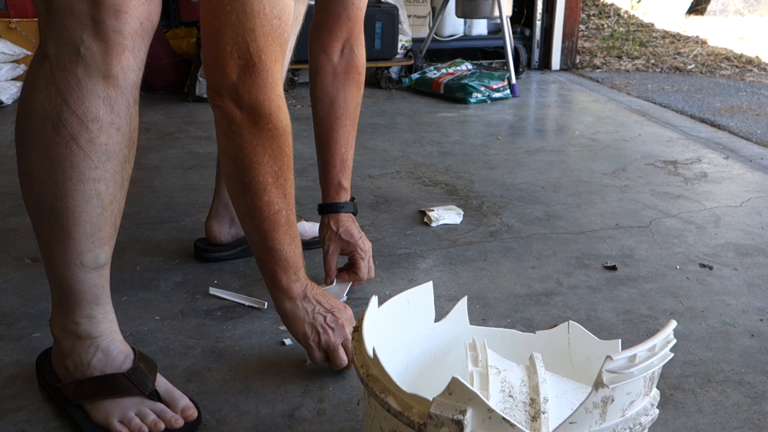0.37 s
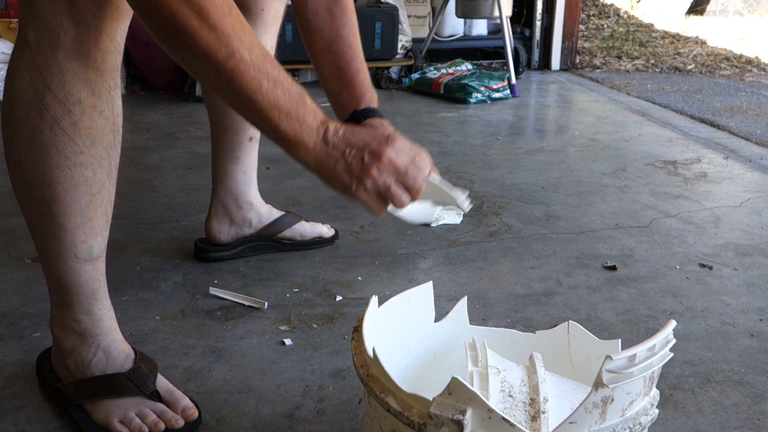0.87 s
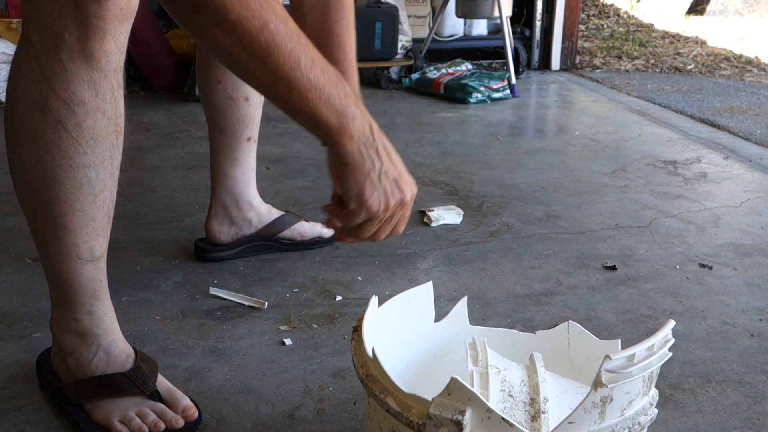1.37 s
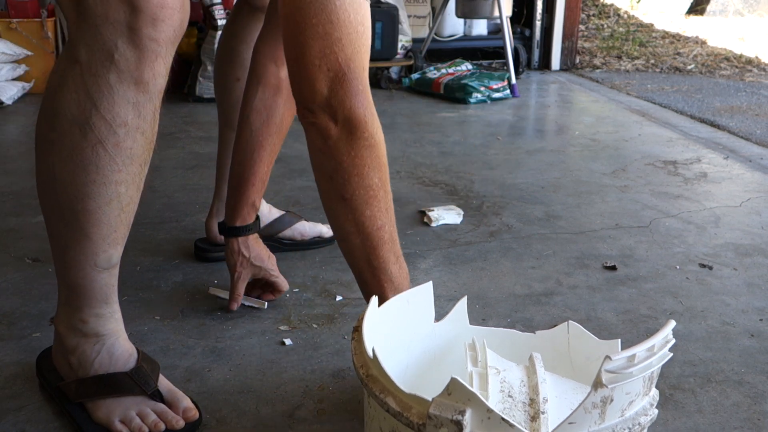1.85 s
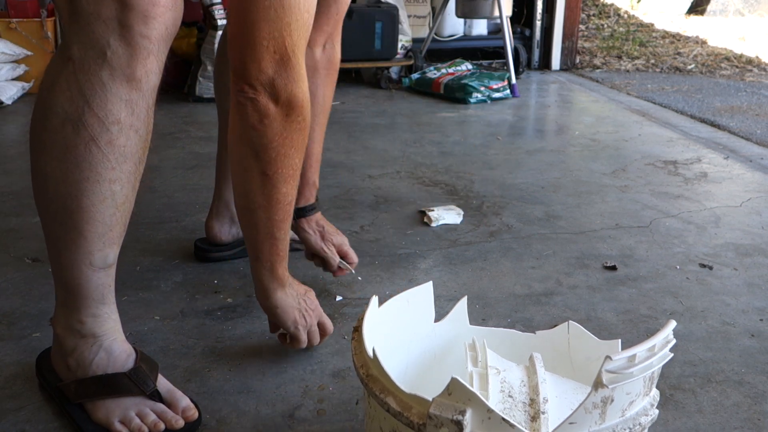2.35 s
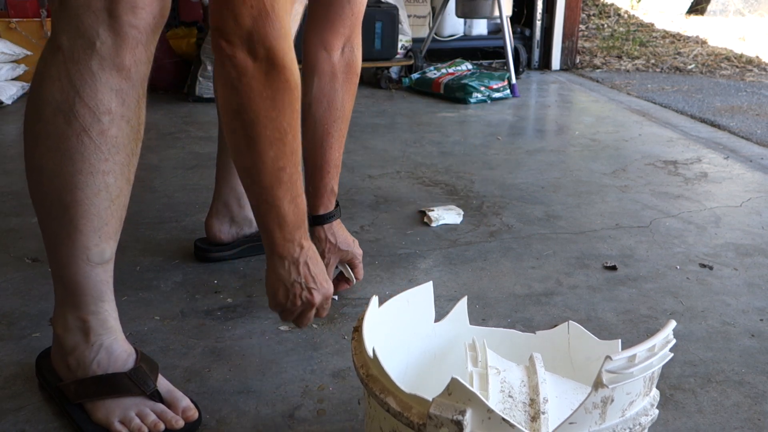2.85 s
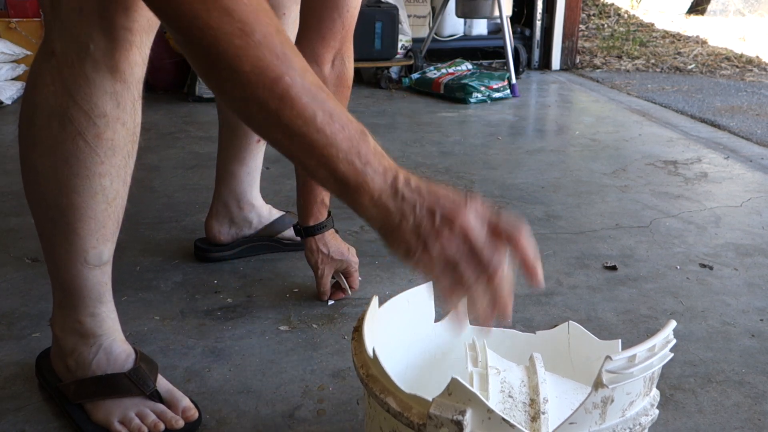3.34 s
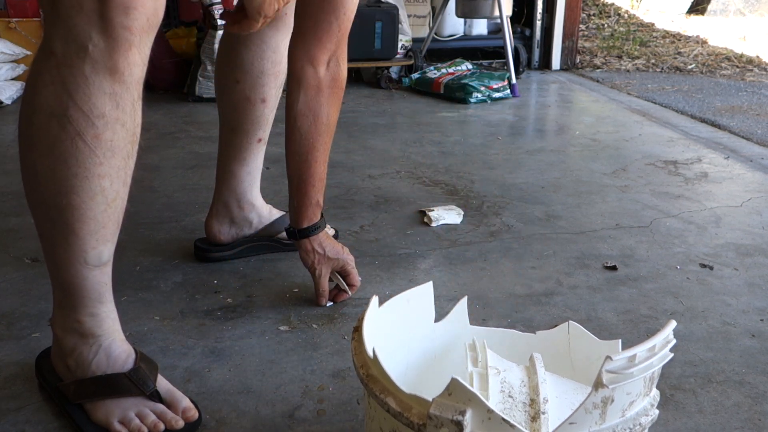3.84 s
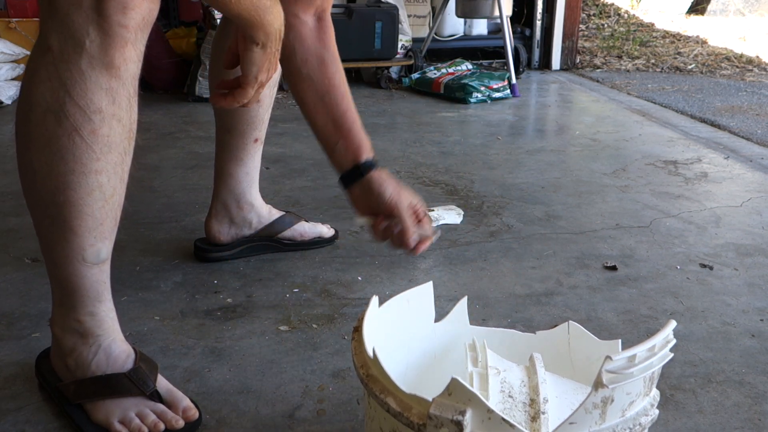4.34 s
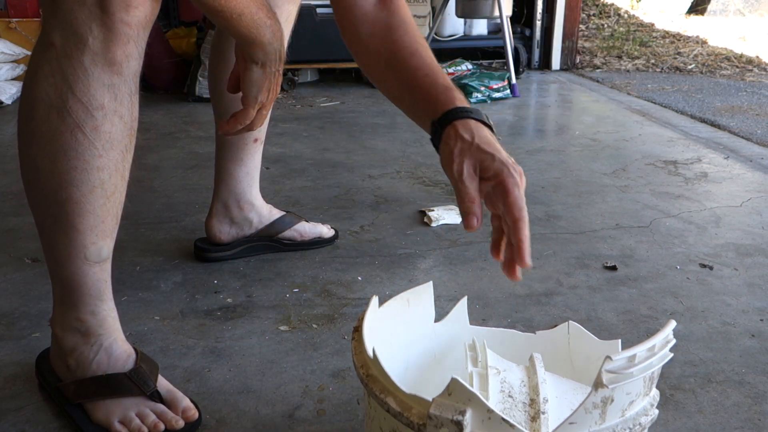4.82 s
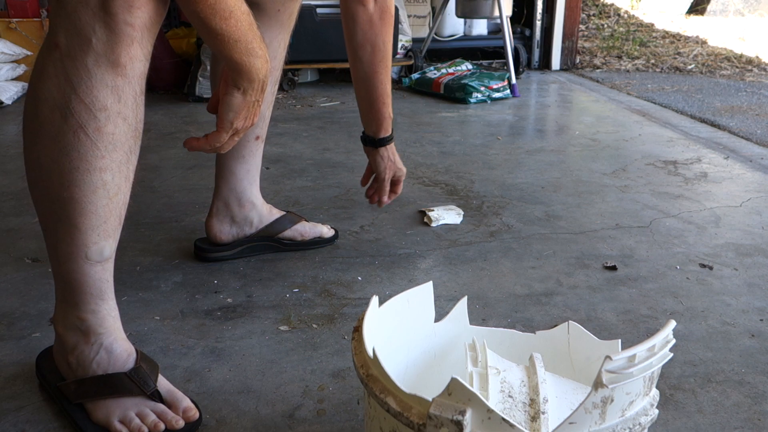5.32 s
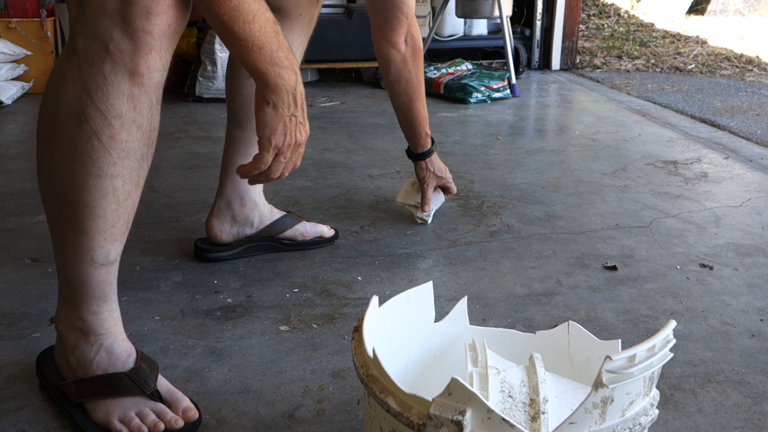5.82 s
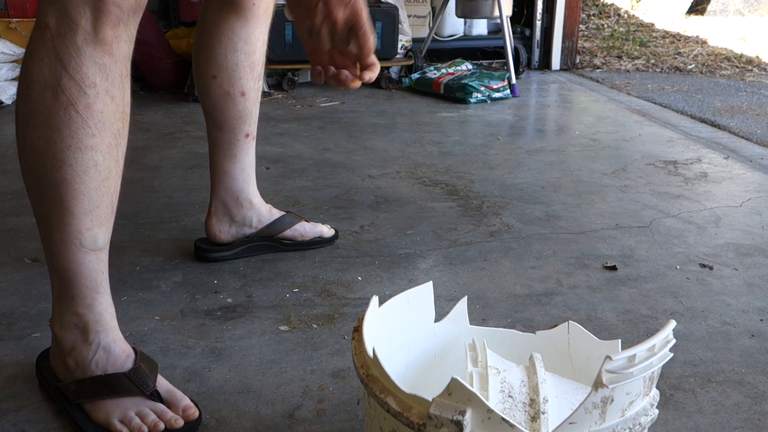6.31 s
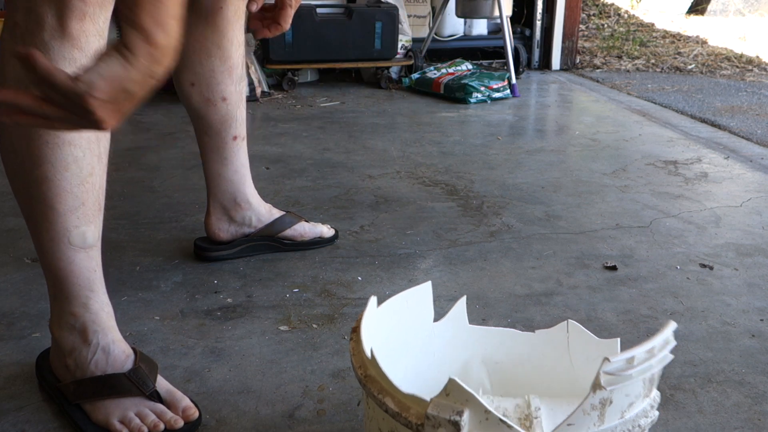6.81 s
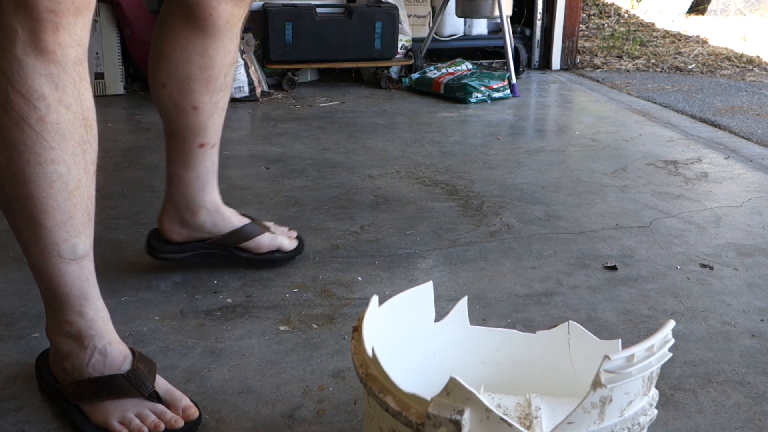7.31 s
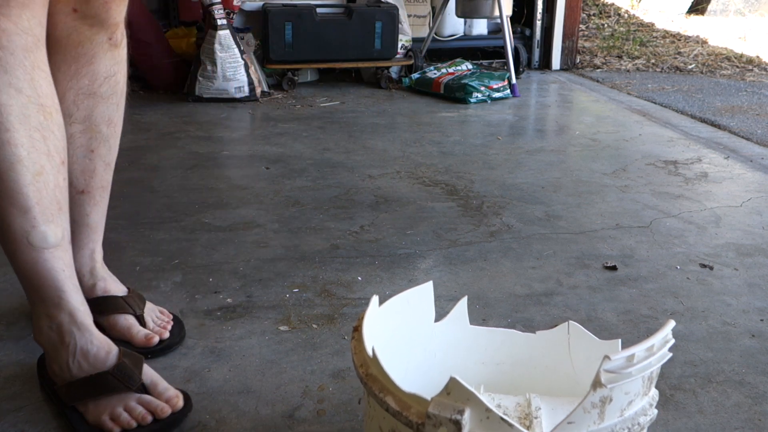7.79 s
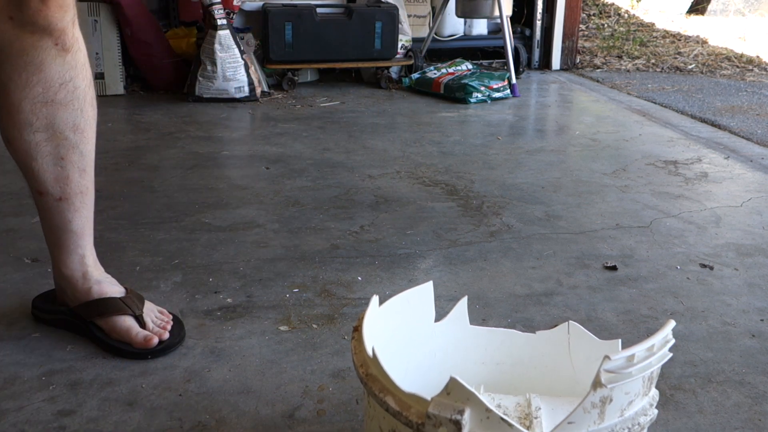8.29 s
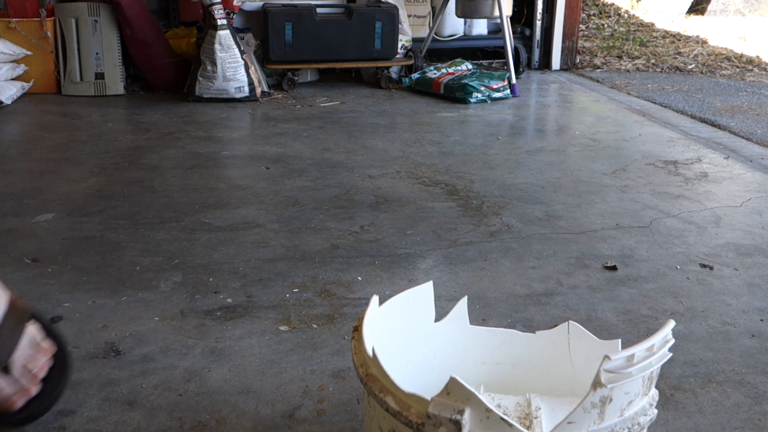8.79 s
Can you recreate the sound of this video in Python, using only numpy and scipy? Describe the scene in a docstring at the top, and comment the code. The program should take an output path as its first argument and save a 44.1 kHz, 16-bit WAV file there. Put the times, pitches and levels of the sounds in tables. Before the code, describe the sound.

In an open concrete garage, shards are gathered with light clacks and gritty rasping, then dropped in sharp, brittle bursts into a hollow plastic bucket slightly right of centre. Near-silence between drops reveals soft outdoor air and distant road hum. After a final hard clatter and settling rattle, sandal soles scrape off leftwards. Close stereo pickup with brief room reverberation.

```python
"""Over the hush and low hum of far traffic, brittle plastic shards clack, bounce and rattle in a broken
plastic bucket, while sandals and hands scuff the concrete floor of an open garage that echoes.
Hits are decaying plate modes with noisy cracks; knocks excite the modes of the bucket wall. Tumbling and
scuffing are dense random grains under gain envelopes, one hollow mode drones, and the outdoors is shaped noise."""
import sys
import numpy as np
from scipy import signal
from scipy.fft import rfft, irfft, next_fast_len
from scipy.io import wavfile
from scipy.ndimage import uniform_filter1d, minimum_filter1d, map_coordinates

SR = 44100
rng = np.random.default_rng(int(sys.argv[2]) if len(sys.argv) > 2 else 0)


def bounce(signal):
    """Save signal as a 16-bit WAV file at the path given by the first command-line argument."""
    frames = np.transpose(np.atleast_2d(signal))
    limited = np.clip(frames, -1, 1)
    pcm = np.round(limited * 32767).astype(np.int16)
    wavfile.write(sys.argv[1], SR, pcm)


def voltage_ratio(level):
    """Linear amplitude factor for a level in decibels (scalar or array-like)."""
    return 10 ** (np.asarray(level, float) / 20)


N = 392831  # length in samples
FAINT = 2e-4  # gain under which no grains are struck
TO_THE_RIGHT_DB = [[-0.8], [0.8]]  # left and right


def unit(x):
    """Normalization: scales a signal to a root-mean-square of one."""
    return x / np.sqrt(np.mean(x ** 2) + 1e-20)


def along(points, hz):
    """Interpolation on a logarithmic frequency axis through (Hz, value) points."""
    f, v = np.transpose(points)
    return np.interp(np.log(hz + 1), np.log(f + 1), v)


def wobble(rate):
    """Slow random modulation: a smooth curve through normal random knots, rate of them a second."""
    knots = rng.standard_normal(int(N * rate / SR) + 4)
    return map_coordinates(knots, [np.arange(N) * rate / SR])


def filtered(x, response):
    """Linear filtering: the spectrum is multiplied by a complex response of frequency."""
    m = next_fast_len(x.shape[-1] + SR // 4)
    spectrum = rfft(x, m) * response(np.fft.rfftfreq(m, 1 / SR))
    return irfft(spectrum, m)[..., :x.shape[-1]]


def paired(pair, alike):
    """Interaural coherence: two unrelated signals are mixed to a given left-right likeness."""
    def mid_side_gains(hz):
        angle = np.arccos(np.clip(along(alike, hz), -1, 1)) / 2
        return np.array([np.cos(angle), np.sin(angle)])
    mid, side = filtered(pair, mid_side_gains)
    return np.array([mid + side, mid - side])


def contacts(rate, spread_db):
    """Random impulse process: clicks of random sign and strength, on average rate of them a second."""
    struck = rng.random(N) < rate / SR
    return struck * rng.standard_normal(N) * voltage_ratio(spread_db * rng.exponential(size=N))


def pings(rate, inside, centre_hz, spread, cycles, spread_db, size=400):
    """Granular synthesis: tiny damped tones at random moments, pitched loosely around a centre."""
    at = np.flatnonzero((rng.random(N) < rate / SR) * inside)
    chance = rng.standard_normal((N, 2))[at]
    t = np.arange(size) / SR
    hz = np.clip(centre_hz * np.exp(spread * chance[:, :1]), 900, 15000)
    level_db = spread_db * chance[:, 1:] - 60 * t * hz / cycles  # 60 dB down after that many cycles
    tones = voltage_ratio(level_db) * np.sin(2 * np.pi * hz * t)
    out = np.bincount((at[:, None] + np.arange(size)).ravel(), tones.ravel(), N + size)[:N]
    return out / np.sqrt(np.sum(out ** 2) / np.sum(inside))


def bursts(starts, holds, levels_db, rise_s, fall_db_per_s):
    """Incoherent addition: events swell up to their start, hold and die away, and their powers add."""
    t = np.arange(SR) / SR - 0.25
    power = np.zeros(N + SR)
    for s, hold, db in zip(starts, holds, levels_db):
        rise_db = 30 * np.minimum(t / rise_s, 0)  # 30 dB per rise_s
        fall_db = fall_db_per_s * np.maximum(t - hold, 0)
        power[round(s * SR):][:SR] += voltage_ratio(2 * (db + rise_db - fall_db))
    return np.sqrt(power[SR // 4:][:N])


# Spectrum of the outdoor air. Each row: frequency in Hz, relative density in dB per Hz.
AIR_SPECTRUM = [(71, -43), (120, -11.5), (144, -49), (181, -12.5), (334, -9.5), (473, -8.5), (643, -4.5),
                (757, -9.5), (1320, -16.5), (1860, -20), (2290, -19), (2810, -22), (16000, -29.5)]
# Coherence of the outdoor air. Each row: frequency in Hz, left-right likeness (1 is identical).
AIR_COHERENCE = [(60, 0.64), (180, 0.69), (550, 0.89), (1650, 0.083), (4970, 0.047), (15000, 0.06)]
# Spectrum of the far traffic. Each row: frequency in Hz, relative density in dB per Hz.
ROAD_SPECTRUM = [(15, -31), (30, -7.5), (60, 1.5), (100, 4.5), (200, 0.5), (400, -25)]
AIR_DB, ROAD_DB, HUM_DB = -53.5, -63.5, -68.5  # mean levels
HUM_HZ = 96  # mean pitch


def air():
    """Stationary shaped noise: far traffic and outdoor air through the open door, with a wavering low hum."""
    noise = filtered(rng.standard_normal((2, N)), lambda hz: voltage_ratio(along(AIR_SPECTRUM, hz)))
    road = unit(filtered(rng.standard_normal(N), lambda hz: voltage_ratio(along(ROAD_SPECTRUM, hz))))
    hum_gain = voltage_ratio(HUM_DB + 1.5 * wobble(3.3))
    hum = hum_gain * np.sin(2 * np.pi * np.cumsum(HUM_HZ + 1.5 * wobble(12.0)) / SR)
    drift_db = 1.1 * wobble(1.5)
    hiss = voltage_ratio(AIR_DB + drift_db) * unit(paired(noise, AIR_COHERENCE)) * voltage_ratio([[-0.7], [0.7]])
    return hiss + voltage_ratio(ROAD_DB + 1.3 * wobble(1.87)) * road + hum


# Modes of the bucket wall. Each row: centre in Hz, bandwidth in Hz, level in dB.
WALL_MODES = [(259, 102, -14), (325.6, 76, -2.5), (392, 192, -5.5), (564, 37, -0.5), (641, 10.2, 2),
              (696.4, 11.5, 3), (813, 93, -6), (1228, 65, -9.5), (1426, 72, -16)]


def bucket(blows):
    """Modal resonance: blows excite a bank of damped resonators, so the bucket wall rings briefly."""
    def response(f):
        total = 0
        for k, (centre, width, db) in enumerate(WALL_MODES):
            damping = 1j * f * width
            total = total + (-1) ** k * voltage_ratio(db) * damping / (centre * centre - f * f + damping)
        return total
    return filtered(blows, response)


# Shards striking each other, the floor or the wall. Each row: time in seconds, level of the main mode in dB,
# pitch of the main mode in Hz, crack level relative to that mode in dB.
SHARD_HITS = [(0.029, -38.5, 2500, -19), (0.0463, -31, 2130, -19), (0.0896, -33.5, 2610, -3.5),
              (0.1032, -22, 2590, -14), (0.1386, -19, 2280, -34), (0.1488, -19, 2610, -32),
              (0.1554, -17, 2780, -24), (0.1765, -21, 2650, -33), (0.2194, -28.5, 3760, -6),
              (0.2333, -31, 2230, -14), (0.3753, -25, 2320, -30), (0.3978, -24.5, 2430, -19),
              (0.4702, -24.5, 4450, -13), (0.4784, -30, 2400, -18), (1.081, -39.5, 5370, -13.5),
              (1.0892, -36.5, 2600, 3.5), (1.1316, -19.5, 2590, -13), (1.132, -24, 1430, -34),
              (1.146, -27.5, 1430, -34), (1.1626, -27.5, 1450, -24), (1.2294, -2, 1770, -17),
              (1.299, -19, 5820, -3.5), (1.337, -20.5, 6000, -4.5), (1.3828, -14.5, 6100, -2),
              (1.396, -16.5, 6120, -10), (1.5344, -32.5, 3660, -38), (1.5623, -14.5, 8030, -2),
              (1.5815, -9.5, 1280, -19), (1.6872, -21.5, 1790, -27), (1.731, -22.5, 2070, -32),
              (1.76, -26, 1760, -53), (1.8385, -26.5, 5670, 1.5), (2.012, -36.5, 5350, 4),
              (2.0974, -52.5, 3730, 10), (2.269, -61, 5950, 12.5), (2.5885, -50, 8900, -5),
              (3.3882, -46, 2650, -10), (3.4487, -12, 8800, -8.5), (3.458, -4, 8840, -22),
              (3.4765, -7.5, 2050, -4), (3.6096, -17.5, 3950, -14), (3.6946, -29, 5030, -4.5),
              (3.7673, -17, 2260, -29.5), (3.7927, -24.5, 1710, -20.5), (4.8109, -24, 2210, -3),
              (4.8368, -1.5, 2010, 2), (5.001, -19, 2260, -14), (5.025, -15.5, 1880, -12),
              (5.1158, -22.5, 1950, -9), (5.2678, -13.5, 2237, -16), (5.2726, -13, 2100, -26),
              (5.276, -24.5, 3640, -8), (5.3204, -25, 3730, -25), (5.7697, -42, 5460, -3),
              (5.882, -36, 1690, -31), (5.8885, -30.5, 2820, -22), (5.9145, -35.5, 1720, -22),
              (6.252, -44.5, 3000, -14), (6.3138, -38, 3280, -27), (6.7445, -34, 3070, -26),
              (6.7479, -31, 4000, -9), (6.785, -1, 2930, -1), (6.829, -7.5, 3040, -7),
              (6.853, -13, 6140, -2.5), (6.886, -15.5, 2300, -13), (6.94, -17, 2040, -23),
              (7.0073, -21, 1740, -20), (7.0454, -19, 1800, -23), (7.0636, -15.5, 4470, -4.5),
              (7.089, -33, 4400, -22), (7.0825, -19.5, 3070, -7), (7.1316, -23.5, 4360, -29),
              (7.1692, -28, 2360, -7), (7.185, -27, 4360, -5), (7.2064, -17.5, 3600, -15.5),
              (7.242, -27.5, 2600, -13), (7.2888, -31.5, 2100, -11.5), (7.3437, -32.5, 2800, -21.5),
              (7.3445, -29, 1420, -23), (7.407, -36.5, 1473, -14), (7.635, -44, 2680, 0),
              (8.1606, -42.5, 2880, -11), (8.4, -42, 1100, -25)]
# Heavy pieces knocking the bucket wall. Each row: time in seconds, level in dB before BLOW_DB is added.
WALL_KNOCKS = [(0.0463, -14), (1.2281, 14), (1.5618, 8), (1.5803, 17.5), (1.7315, 4.5), (1.76, 5),
               (3.7673, -4), (5.027, 7.5), (6.785, 23), (7.0454, -5), (7.398, -18), (8.4004, -18)]
LADDER_DB, HARD_ADDS = -2.5, 0.22  # side modes relative to the main one; dB more per dB of crack
NUDGE_DB = -14  # how much any contact shakes the bucket
BLOW_DB = 20  # a one-sample blow carries little energy into narrow modes


def hits(count=40):
    """Impact excitation: each contact cracks, rings a plate mode with a dense ladder and knocks the bucket."""
    out, blows = np.zeros((2, N + SR)), np.zeros(N)
    t = np.arange(SR // 20) / SR
    rung = np.arange(count)[:, None]
    is_side = rung > 0
    for s, db, hz, crack_db in SHARD_HITS:
        ladder = 1400 * np.exp(0.055 * (rung + rng.random((count, 1))))
        modes = np.where(is_side, ladder, hz)
        t60 = np.where(is_side, 0.016, 0.026) * (3000 / modes) ** 0.3  # higher modes die sooner
        distance_db = 12 * np.abs(np.log2(modes / hz))  # 12 dB per octave from the main mode
        side_db = LADDER_DB + HARD_ADDS * crack_db - distance_db + rng.normal(0, 2.0, (count, 1))
        size_db = np.where(is_side, side_db, 0)
        phase = 2 * np.pi * (modes * t + rng.random((count, 1)))
        ring = np.sum(voltage_ratio(size_db - 60 * t / t60) * np.sin(phase), 0) * (1 - np.exp(-t / 0.00045))
        # noise partly shared by the two channels, tilted towards the treble
        crack = np.diff(0.81 * rng.standard_normal((2, len(t) + 2)) + rng.standard_normal(len(t) + 2))
        crack = crack[:, 1:] + crack[:, :-1]  # a blunt edge softens the very top
        crack_gain = voltage_ratio(crack_db - 60 * t / 0.018) * (1 - np.exp(-t / 0.00017))
        out[:, round(s * SR):][:, :len(t)] += voltage_ratio(db) * (ring + crack_gain * crack)
        blows[round(s * SR)] = voltage_ratio(db + NUDGE_DB + BLOW_DB)
    for s, db in WALL_KNOCKS:
        blows[round(s * SR)] += voltage_ratio(db + BLOW_DB)
    return out[:, :N] + bucket(blows)


# Reverberation time of the garage. Each row: frequency in Hz, time to decay by 60 dB in seconds.
GARAGE_T60 = [(200, 0.38), (700, 0.47), (2500, 0.38), (8000, 0.33), (15000, 0.26)]
# Coherence of the echo. Each row: frequency in Hz, left-right likeness (1 is identical).
GARAGE_COHERENCE = [(200, 1), (1000, 0.93), (2500, 0.79), (6000, 0.1), (15000, 0.11)]


def garage(x, count=30):
    """Diffuse reverberation: each stretch of time is convolved with its own decaying noise tail."""
    out, step = np.zeros((2, N + SR)), -(-N // count)
    for start in range(0, N, step):
        hz, t, z = signal.stft(rng.standard_normal((2, SR // 2)), SR, nperseg=256)
        decay = voltage_ratio(-60 * t / along(GARAGE_T60, hz)[:, None])
        tail = signal.istft(z * decay, SR, nperseg=256)[1]
        onset = 1 - np.exp(-np.arange(tail.shape[1]) / SR / 0.00067)
        tail = paired(tail * onset, GARAGE_COHERENCE)
        wet = signal.fftconvolve(x[None, start:start + step], tail / np.linalg.norm(tail[0]), axes=1)
        out[:, start:][:, :wet.shape[1]] += wet
    return out[:, :N]


# Pieces tumbling after a contact. Each row: start in seconds, hold in seconds, shard level in dB,
# bucket level relative to the shards in dB, crackle level relative to the shards in dB (all before mixing gains).
TUMBLES = [(0.052, 0.024, -35.5, -3.5, -13), (0.11, 0.14, -46.5, 3.5, -7), (0.375, 0.004, -40.5, -3, 11.5),
           (0.465, 0.0081, -45.5, -22, 13.5), (1.073, 0.018, -57.5, 6, 15), (1.129, 0.0073, -40, 1.5, 9.5),
           (1.228, 0.064, -9.5, 2, -13.5), (1.279, 0.1, -12, -0.5, -14), (1.372, 0.033, -27.5, 1, 2.5),
           (1.526, 0.015, -23.5, -0.5, -31), (1.563, 0.0024, -17.5, 2, -6.5),
           (1.572, 0.03, -8.5, -1.5, -20.5), (1.677, 0.067, -30.5, 6.5, -34.5),
           (1.836, 0.021, -42, 1.5, 6.5), (3.449, 0.023, -24, -0.5, 4.5), (3.465, 0.047, -15, 1.8, -9),
           (3.607, 0.01, -23.5, -9, -2.5), (3.764, 0.0047, -19, -9, -9), (4.813, 0.0026, -17, 2, -12),
           (4.83, 0.11, -12, -5, -12), (5.024, 0.011, -16, -7.5, -8), (5.117, 0.006, -33.5, 5.5, 2),
           (5.267, 0.046, -21.5, -5.5, -15), (6.785, 0.012, -4, 1, -7), (6.805, 0.16, -14.5, 0, -14.5),
           (7.037, 0.011, -31.5, 11, -26), (7.065, 0.026, -22.5, -7.5, -8), (7.203, 0.008, -26, -3.5, -8.5),
           (7.296, 0.088, -37.5, -2.5, -20), (7.4, 0.008, -34, 0, -13.5)]
# Fall in dB per second of bucket, shards and crackle: the lightest pieces come to rest first.
SETTLING = [193.5, 217.5, 284]
TUMBLE_RISE_S = 0.0015  # time to rise by 30 dB
SHARD_HZ, SHARD_SPREAD, CRACKLE_HZ = 2050, 0.376, 6540  # spread is in natural-log units of pitch


def tumble():
    """Stochastic collisions: between clear hits the pieces slide and chatter on each other and the wall."""
    s, hold, db, wall_db, crackle_db = np.transpose(TUMBLES)
    wall, shard, fine = [bursts(s, hold, db + share, TUMBLE_RISE_S, fall)
                         for share, fall in zip([wall_db, 0, crackle_db], SETTLING)]
    inside = shard + fine > FAINT
    thuds = unit(bucket(contacts(700, spread_db=1.16)))
    shards = pings(1500, inside, SHARD_HZ, SHARD_SPREAD, cycles=38, spread_db=4.5)
    scattered = np.array([pings(2000, inside, CRACKLE_HZ, spread=0.28, cycles=12.5, spread_db=2.0, size=200)
                          for ear in range(2)])
    crackle = paired(scattered, [(4000, 1.0), (12000, 0.38)])  # small pieces lie spread across the bucket
    return voltage_ratio(-6.0) * wall * thuds + voltage_ratio(-10.0) * shard * shards + voltage_ratio(-2) * fine * crackle


# Shards, sandals, fingers and paper dragged on concrete. Each row: start in seconds, hold in seconds,
# rasp level in dB before the mixing gain, sizzle level relative to the rasp in dB, left over right in dB.
SCUFF_STROKES = [(0.11, 0.023, -35.5, -8, 2), (0.147, 0.051, -34, -25, 0), (0.227, 0.039, -37.5, -2.5, 2),
                 (0.328, 0.016, -47, 1, 1), (1.866, 0.11, -53.5, 13.5, 0), (2.042, 0.071, -61, 10.5, 3),
                 (2.177, 0.01, -69, 10, -3), (2.29, 0.01, -74, 17, 0.1), (2.41, 0.03, -68, -2.5, 1.5),
                 (2.558, 0.018, -68.5, 15.5, 1), (3.114, 0.02, -79, 7.5, 3), (3.303, 0.04, -81, -6.5, -2.5),
                 (3.385, 0.006, -65, 10, 0), (5.785, 0.027, -46.5, 3.5, -3),
                 (5.885, 0.019, -38, -9.5, -2.5), (6.152, 0.17, -52.5, 1.5, -2), (6.302, 0.017, -45, 0, -1),
                 (6.377, 0.14, -56, 0.5, -2.5), (7.559, 0.065, -43, -4.5, 2.5), (7.654, 0.28, -51.5, -1, 3),
                 (7.87, 0.06, -39.5, -0.8, 4.5), (7.944, 0.012, -37, 0.5, 5), (8.023, 0.09, -51.5, -5, 1.5),
                 (8.158, 0.47, -52, 2, 6), (8.696, 0.008, -40, -1, 4.5), (8.78, 0.091, -58.5, -3, 10)]
# Spectrum of the sizzling grit. Each row: frequency in Hz, relative density in dB per Hz.
GRIT_SPECTRUM = [(2060, -31.5), (3500, -2), (5060, -5), (6280, -3.5), (12200, -11.5), (16000, -12.5)]
STROKE_RISE_S, LIFT_DB_PER_S = 0.071, 222  # time to rise by 30 dB; fall after the hold
RASP_HZ = 2600  # centre of the grain pitches


def scuffs():
    """Stick-slip friction as dense fine grains: grit under a sliding sole gives a rasp and a sizzle."""
    s, hold, db, sizzle_db, pan_db = np.transpose(SCUFF_STROKES)

    def ears(level_db):
        return np.array([bursts(s, hold, level_db + side * pan_db / 2, STROKE_RISE_S, LIFT_DB_PER_S)
                         for side in (1, -1)])
    drag, grit = ears(db), ears(db + sizzle_db)
    rasp = pings(3000, drag[0] > FAINT, RASP_HZ, spread=0.2, cycles=11.7, spread_db=2.0, size=300)
    sizzle = unit(filtered(contacts(6000, spread_db=-0.5), lambda hz: voltage_ratio(along(GRIT_SPECTRUM, hz))))
    return voltage_ratio(-5 + 0.37 * wobble(30)) * (drag * rasp + grit * sizzle)


# Jolts to a hollow thing nearby that drones on. Each row: time in seconds, level in dB.
DRONE_JOLTS = [(1.241, -29.5), (1.57, -73), (4.82, -65), (6.3, -52.5), (6.8, -31.5), (7.4, -52.5)]
DRONE_HZ, DRONE_T60 = 247.2, 1.3  # pitch; seconds to decay by 60 dB


def drone():
    """Free vibration: one low mode decays exponentially after each jolt."""
    t = np.arange(N) / SR
    size = sum(voltage_ratio(db - 60 * (t - s) / DRONE_T60) * (t > s) for s, db in DRONE_JOLTS)
    return size * np.sin(2 * np.pi * DRONE_HZ * t)


def scene():
    """Superposition: near sources, a little right of the microphone, with their echo and the outdoor air."""
    near = scuffs() + (hits() + tumble() + drone()) * voltage_ratio(TO_THE_RIGHT_DB)
    # the near sources carry no deep bass: second-order high-pass at 148 Hz
    near = filtered(near, lambda hz: (1j * hz / (148 + 1j * hz)) ** 2)
    echo = voltage_ratio(-5.0) * garage(near.mean(0)) * voltage_ratio(TO_THE_RIGHT_DB)
    return near + echo + air()


def low_pass(x):
    """Removes everything above the highest recorded frequency."""
    return signal.sosfilt(signal.butter(12, 16800, fs=SR, output="sos"), x)


def record(dry):
    """Peak limiting and band limiting: crashes are held down, and treble rolls off up to 16 kHz."""
    ceiling = 0.71  # of full scale
    need = np.minimum(1, ceiling / (np.abs(dry).max(0) + 1e-9))
    gain = uniform_filter1d(minimum_filter1d(need, size=881), size=1101)  # 20 ms hold, 25 ms smoothing
    mix = filtered(dry * gain, lambda hz: (hz < 16000) / (1 + (hz / 15000) ** 6))
    return low_pass(mix)


dry = scene()
out = record(dry)
bounce(out)
```